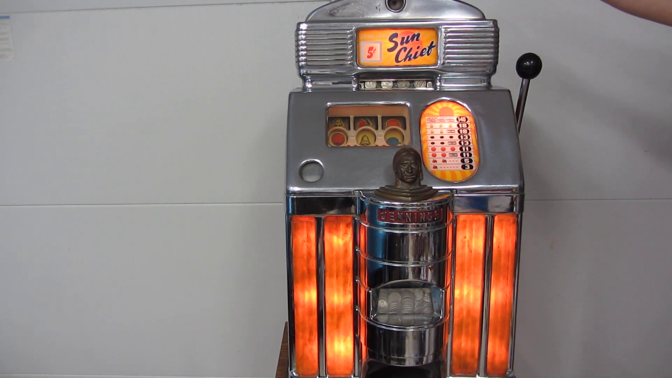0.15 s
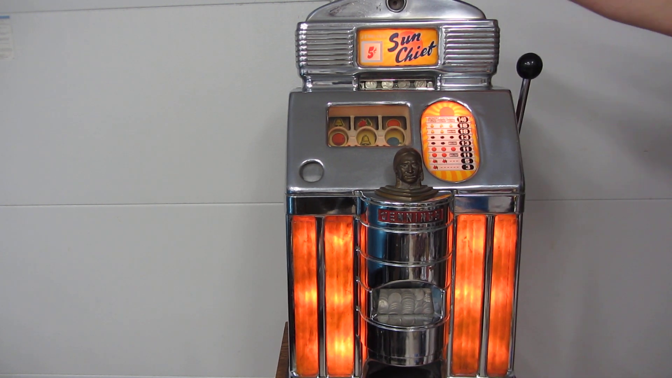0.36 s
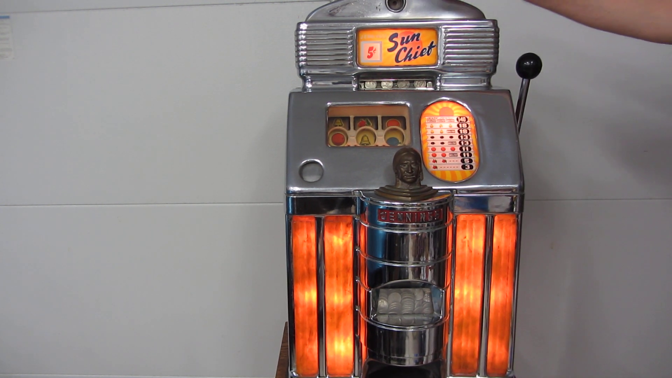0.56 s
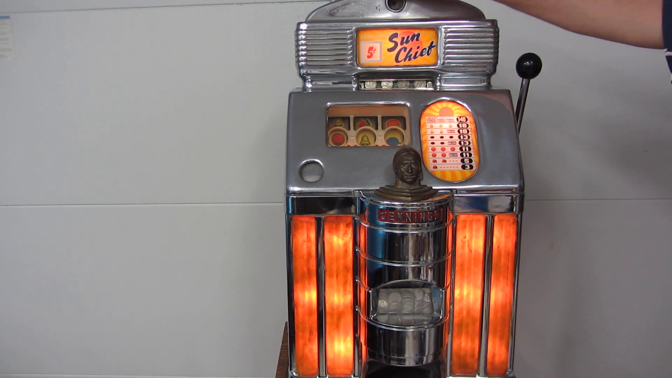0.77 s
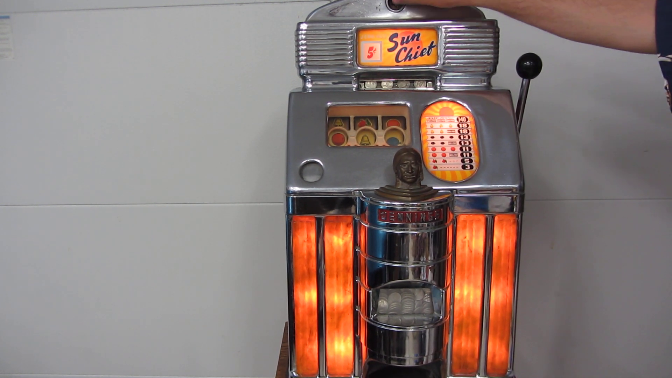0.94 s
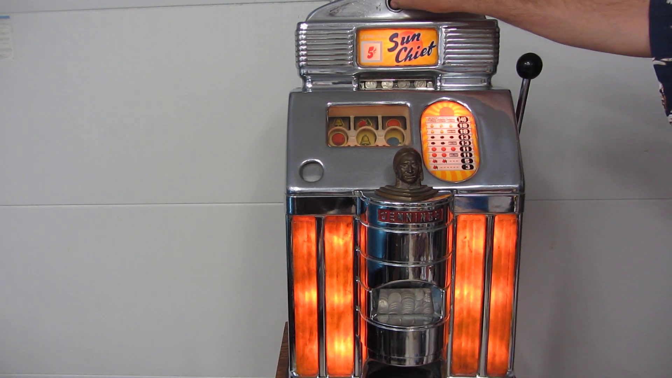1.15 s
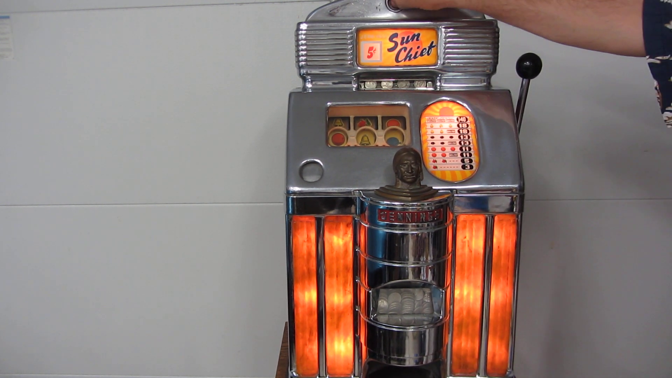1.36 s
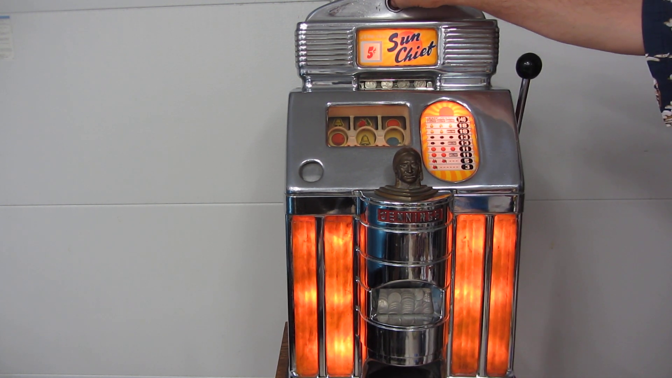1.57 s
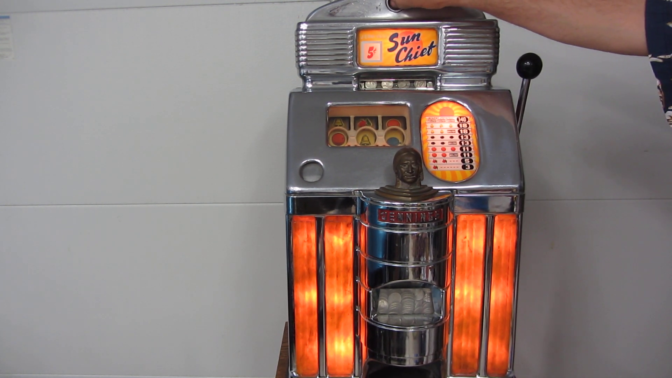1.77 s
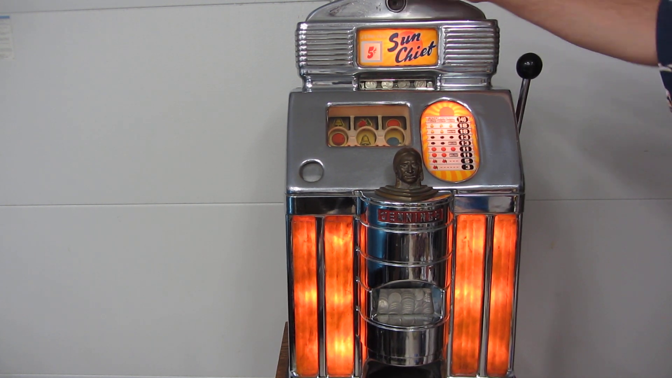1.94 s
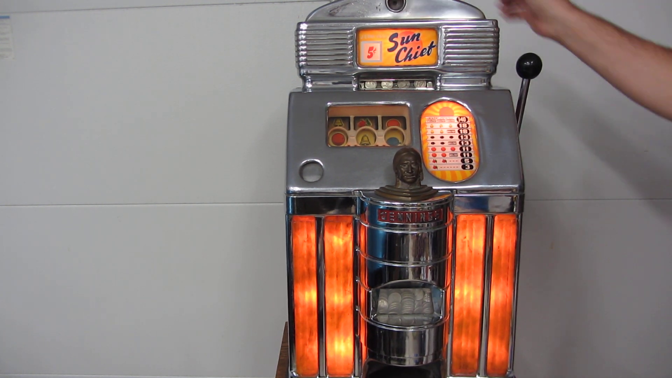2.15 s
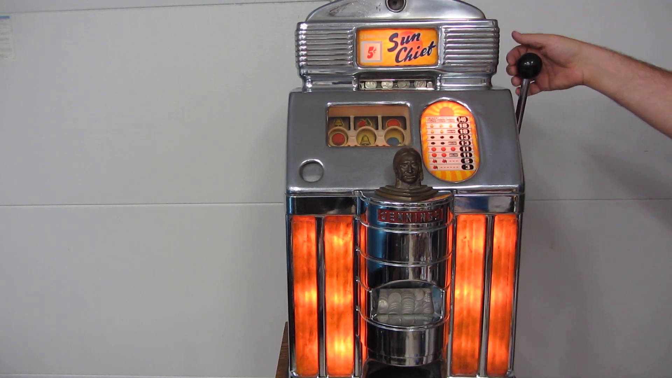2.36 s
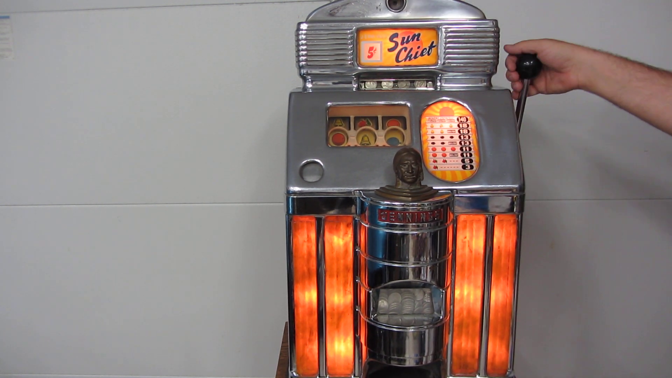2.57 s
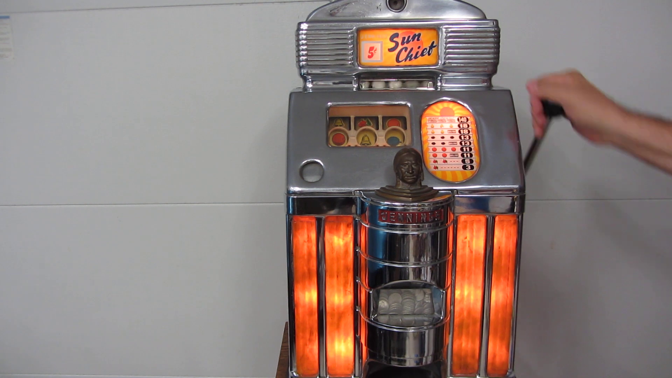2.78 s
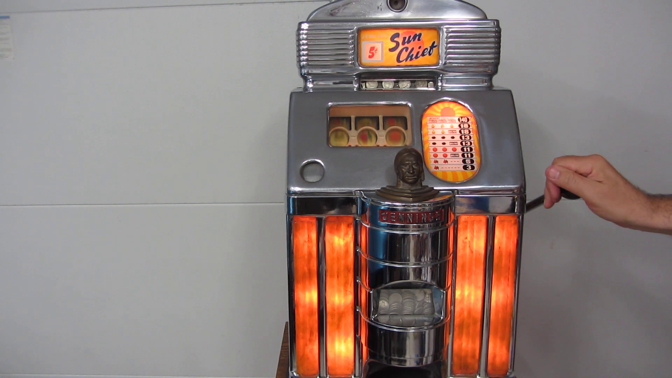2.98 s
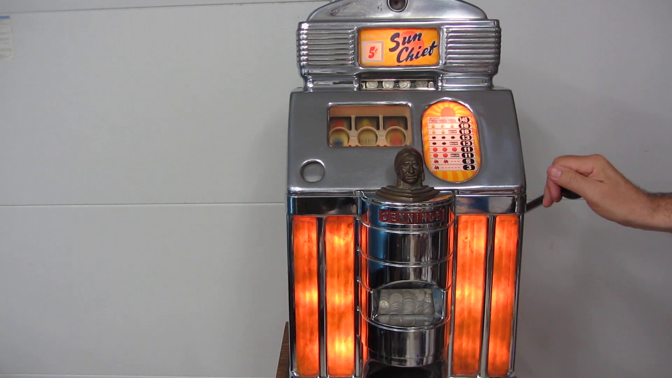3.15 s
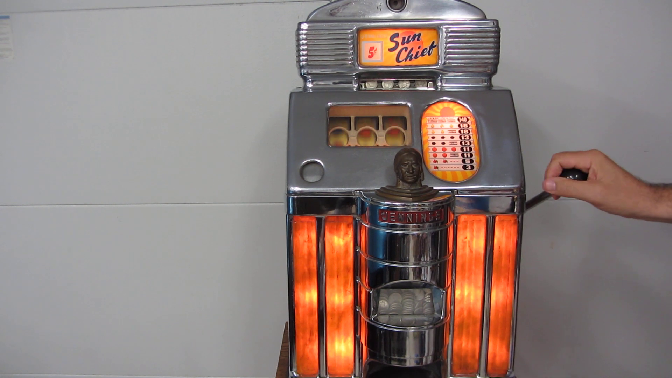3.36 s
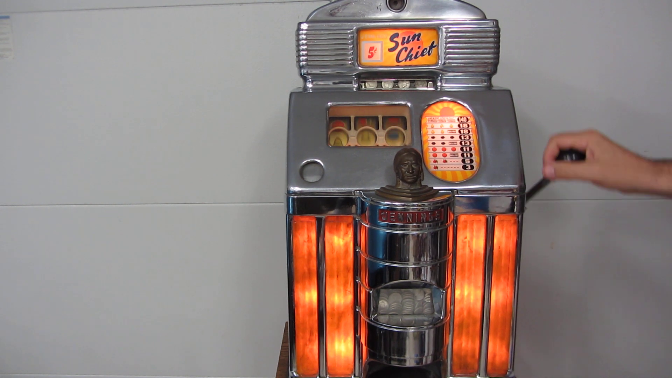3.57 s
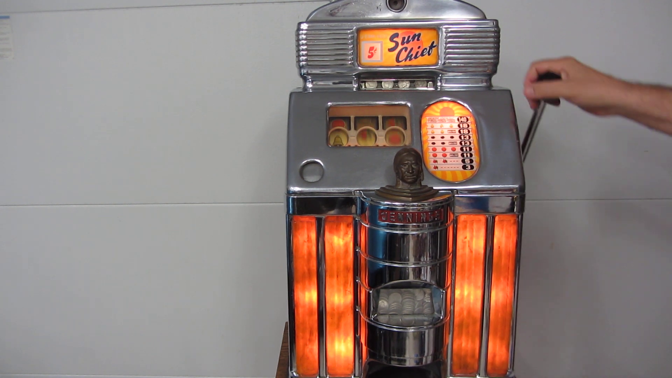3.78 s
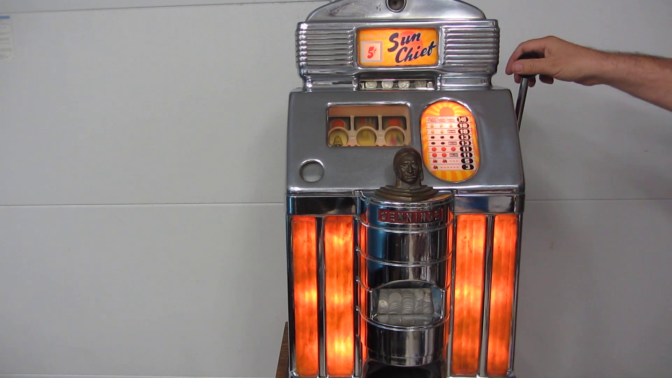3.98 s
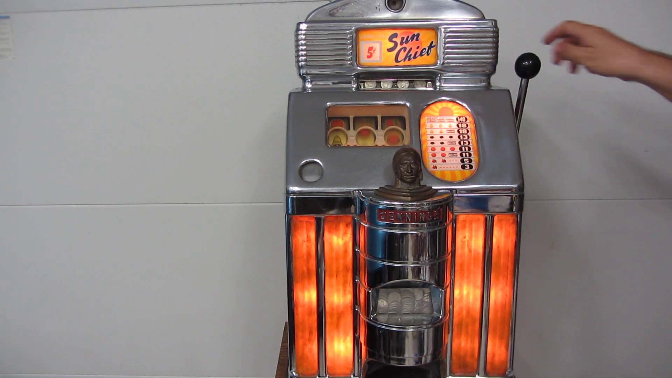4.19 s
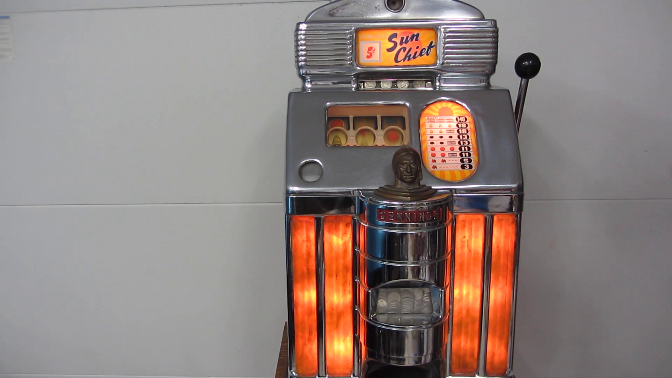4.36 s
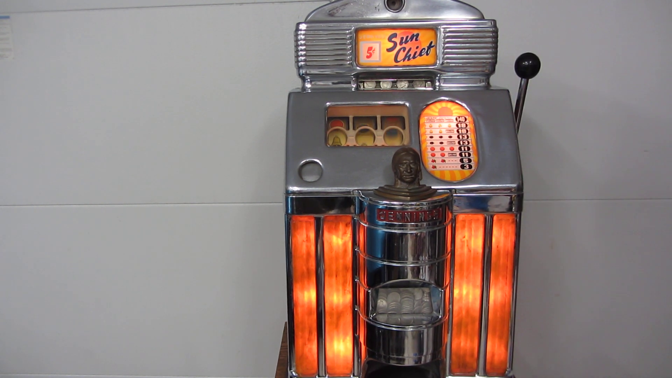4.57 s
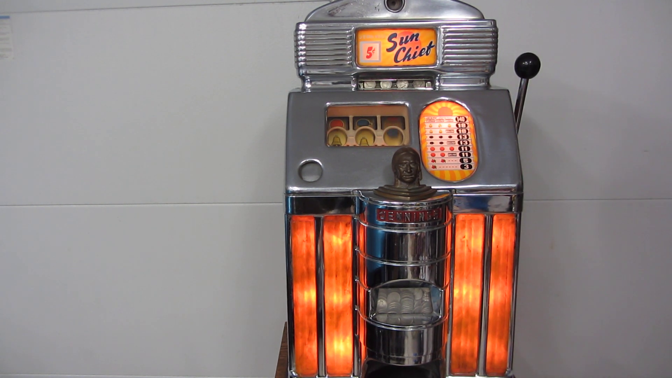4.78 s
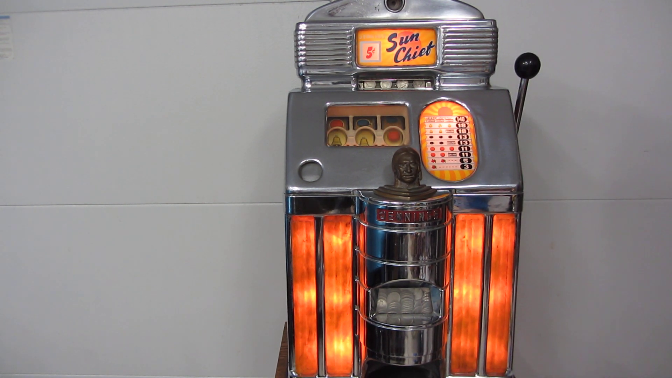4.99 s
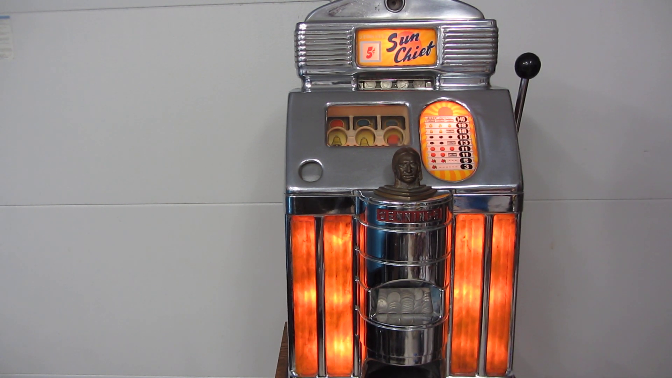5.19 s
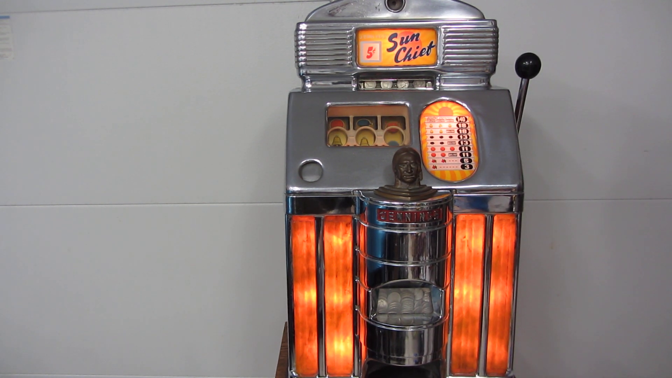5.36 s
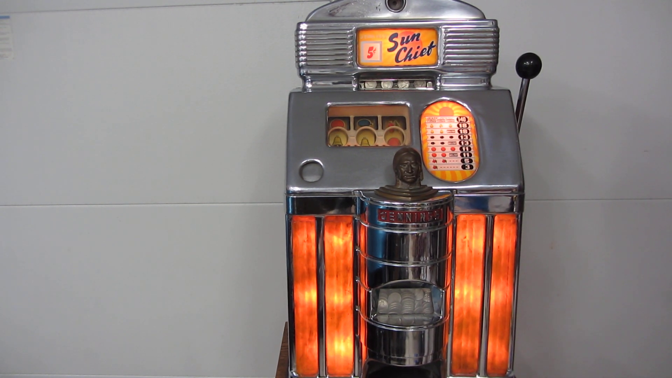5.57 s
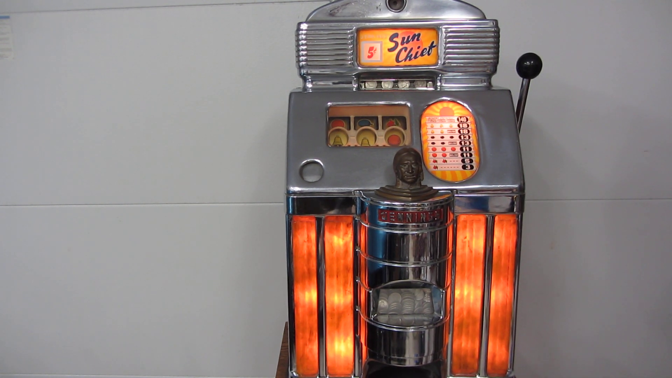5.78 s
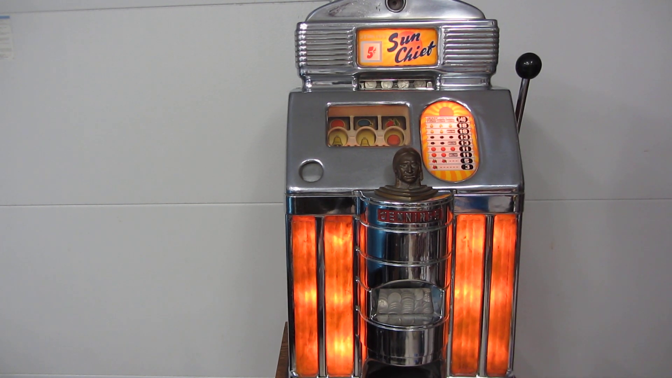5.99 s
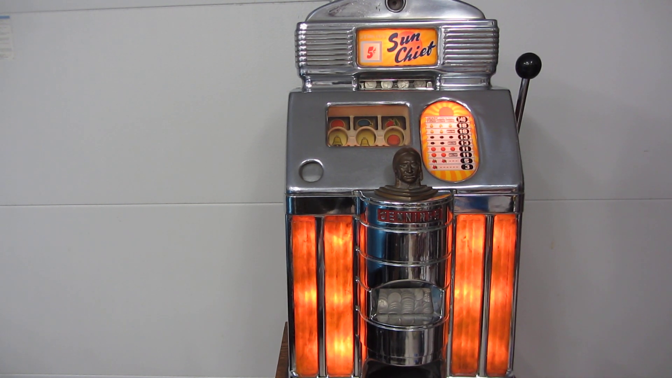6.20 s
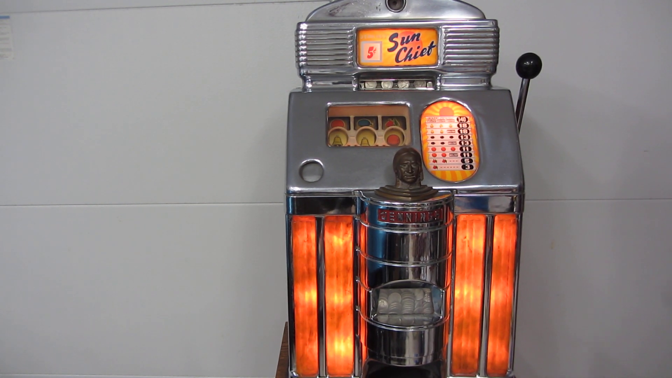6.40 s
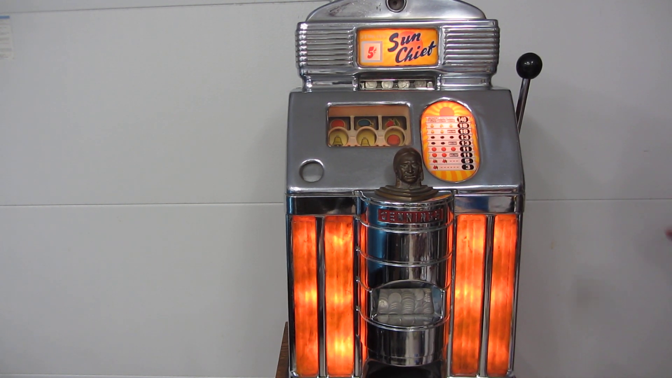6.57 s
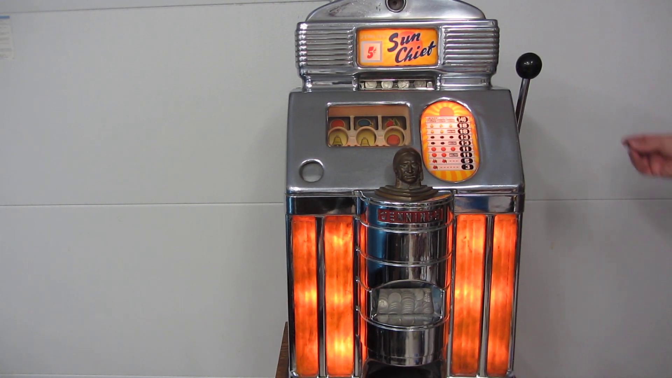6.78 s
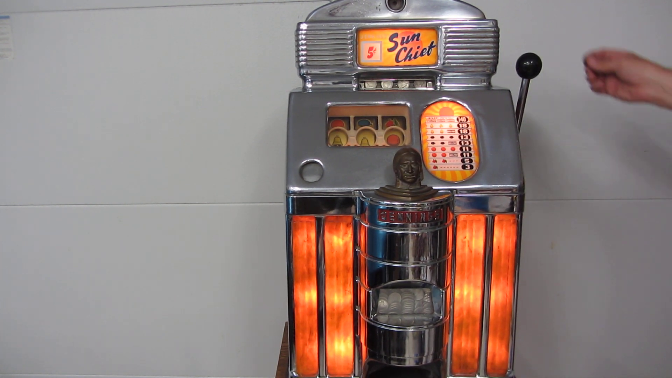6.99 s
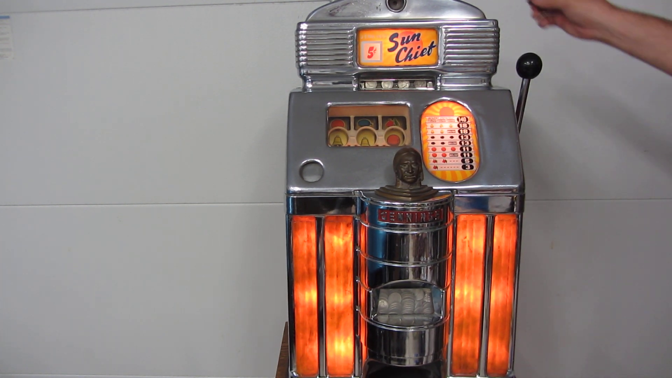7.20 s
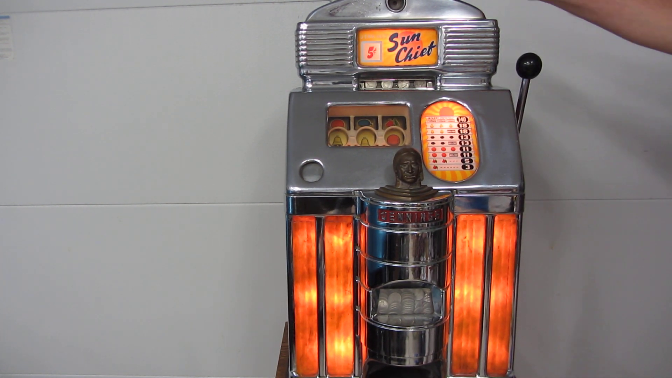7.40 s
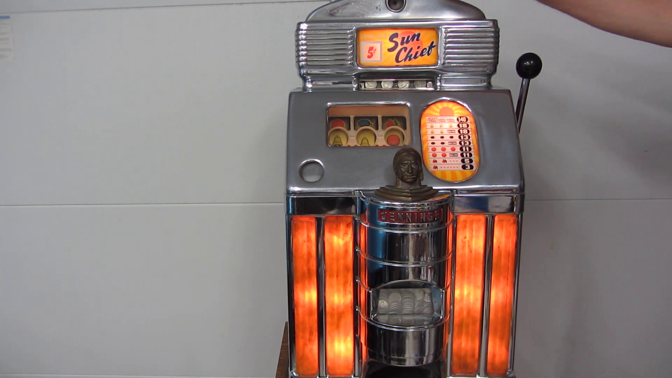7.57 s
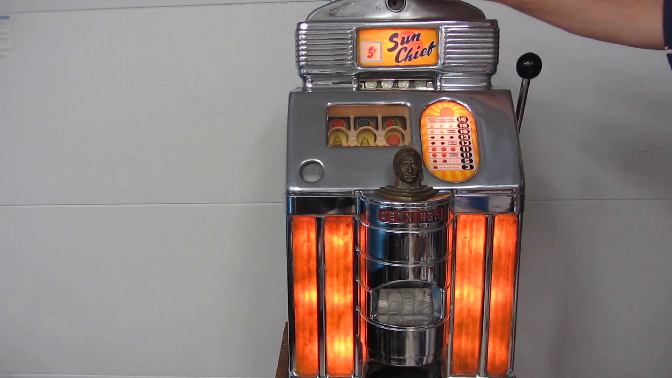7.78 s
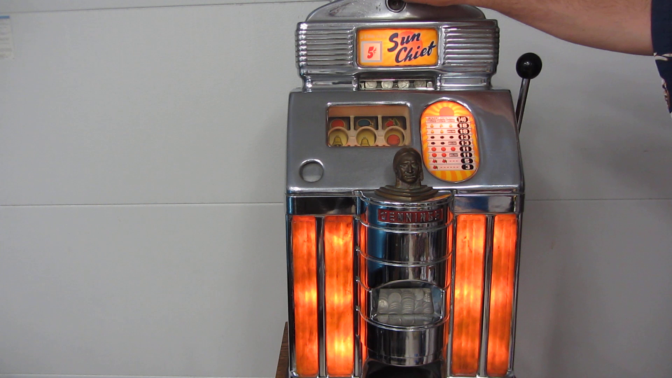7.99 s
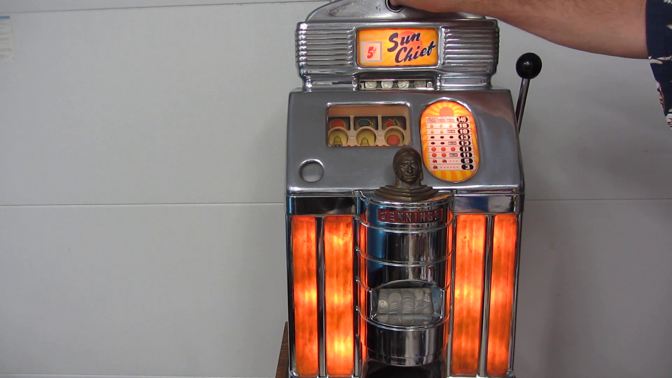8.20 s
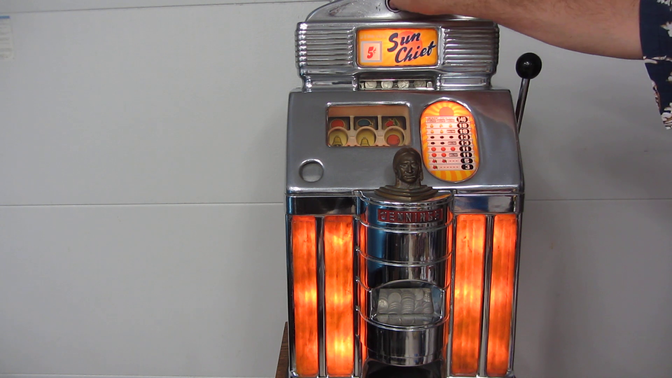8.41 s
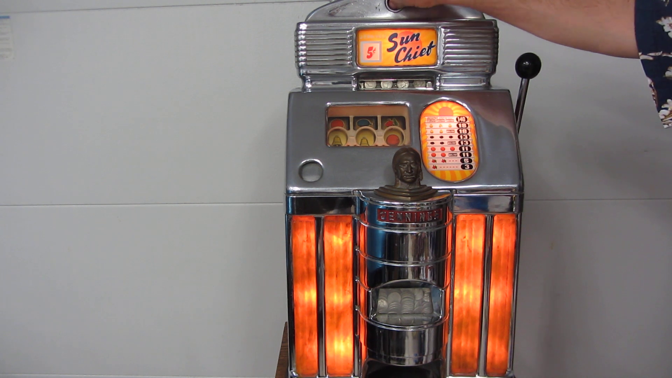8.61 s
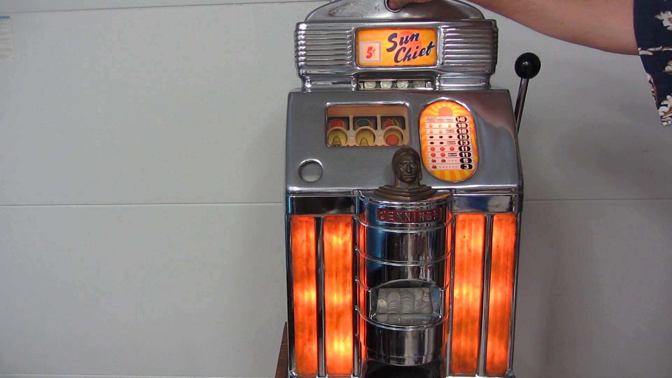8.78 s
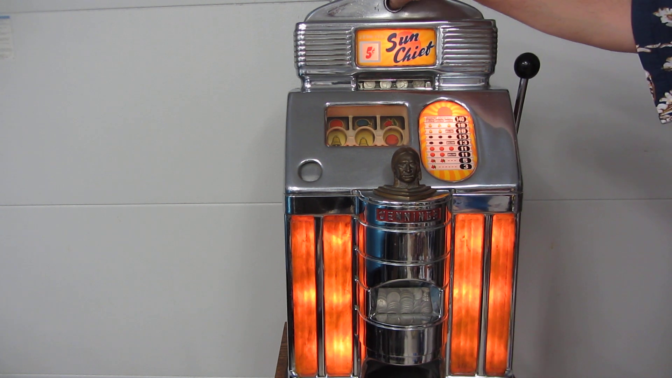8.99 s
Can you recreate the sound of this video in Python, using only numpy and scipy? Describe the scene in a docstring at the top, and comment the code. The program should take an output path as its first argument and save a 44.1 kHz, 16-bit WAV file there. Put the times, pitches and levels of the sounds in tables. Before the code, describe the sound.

Close stereo pickup of a vintage mechanical slot machine in a small quiet room. A sharp snap ends one spin, a latch clunks, and a coin rattles down the chute. The handle ratchets down with dense heavy clacks, levers kick the reels, and they whirr while the handle clicks back. The reels stop one by one with hard clacks, a latch clicks, and another coin is lightly handled.

```python
"""In a small room, a mechanical slot machine ends one game and plays another.
A coin rattles down the chute, the handle is pulled and returns, reels whirr and stop, the next coin
is fed in. Blows are bursts of banded noise coloured by the resonances of each part; clanks, cabinet and
springs are decaying sinusoids. The reels are resonated steady noise, over room air and lamp tones."""
import sys
import numpy as np
from scipy import signal
from scipy.fft import rfft, irfft, next_fast_len
from scipy.io import wavfile

SR = 44100
rng = np.random.default_rng(int(sys.argv[2]) if len(sys.argv) > 2 else 0)


def log_audio(samples):
    """Write samples as a 16-bit WAV file to the path given in sys.argv[1]."""
    # one column per channel
    frames = np.atleast_2d(samples).T
    # limit to full scale, then quantise
    limited = np.clip(frames, -1, 1)
    pcm = np.round(limited * 32767).astype(np.int16)
    wavfile.write(sys.argv[1], SR, pcm)


N = 399105

# Blows, all relative levels: (time [s], clack level [dB], brightness [dB], low thump level [dB])
# Coins handled, pushed into the slot and falling down the chute, columns as above
COIN_BLOWS = [(1.1428, -40, -11, -51), (1.2136, -33, -1, -58), (1.264, -37, -2, -55), (1.3127, -26, 0, -52),
              (1.3987, -35, 7, -51), (1.4268, -38, -6, -65), (1.4975, -21, 6, -58), (1.516, -22, 6, -60),
              (1.545, -26, -4, -50), (1.5681, -19, 6, -65), (1.5914, -18, -3, -54), (1.6335, -10.5, 1, -30),
              (1.7725, -24.5, 0, -29), (1.8306, -39, 3, -38), (2.0895, -30, 0, -42), (5.0565, -38, -8, -55),
              (5.1246, -52, 13, -55), (5.2953, -55, 13, -58), (5.319, -48, 13, -55), (5.331, -51, 17, -58),
              (7.5605, -48, -18, -58), (7.8133, -24, -4, -57), (8.0992, -52, -20, -55),
              (8.3385, -33, 2, -50), (8.4018, -32, -3, -63), (8.4508, -39, -7, -62), (8.4837, -29, 1, -64),
              (8.655, -37.5, -6, -57)]
# The handle takes up the mechanism, cocks the springs and hits its stop, columns as above
PULL_BLOWS = [(2.6572, -45, -6, -50), (2.7034, -17, -5, -21.5), (2.8165, -17, 4, -28),
              (2.8604, -14, 4, -31), (2.8982, -17, 2, -30), (2.938, -14.5, -3, -24), (2.9708, -11, 1, -29),
              (2.9894, -17, 2, -15), (3.061, -23, 0, -28.5), (3.0789, -23, -1, -24.5),
              (3.1315, -35, 2, -50), (3.205, -42, 1, -46), (3.2351, -46, -13, -44), (3.3327, -37, -6, -41)]
# The reel levers lift, kick the reels off and drop into the first two, columns as above
LEVER_BLOWS = [(3.477, -44, 0, -52), (3.493, -18.5, -2, -37), (3.5657, -16, -6, -25), (3.682, -31, -5, -32),
               (3.7357, -24, -7, -29), (3.7544, -31, -9, -31), (3.8211, -32, -4, -32),
               (3.8647, -7.5, -0.5, -21), (4.584, -11, 1, -25), (4.664, -17, -1, -38),
               (4.6991, -31, -5, -29), (5.6138, -14, -0.5, -25), (5.6496, -16.5, -1, -28),
               (5.7429, -29, -6, -34.5)]
# The last reel is caught and the payout fingers snap forward, columns as above
FINGER_BLOWS = [(.176, -13, 3, -34.5), (.181, -12, -1, -28), (.2872, -25, -12, -52), (6.32, -10.5, 0, -40),
                (6.331, -13, -4, -28.5), (6.402, -26, -12, -42)]
# The timing bar latches at the end of a game, columns as above
LATCH_BLOWS = [(.7791, -17, -1, -36), (7.0076, -18, 0, -38)]
# The handle returns with a run of clacks while the reels spin, columns as above
HANDLE_RETURN_BLOWS = [(4.2283, -30, 2, -32), (4.2632, -35, 1, -49), (4.3156, -27.5, -1, -58),
                       (4.356, -29, 2, -47), (4.4184, -22, 0, -54), (4.4314, -28, 0, -57),
                       (4.4503, -13, 0, -48), (4.5057, -31, 4, -34)]
# First blow of a quick run, columns as above: pawl on ratchet teeth, levers juddering after the kick
FIRST_TOOTH = (2.727, -23.5, 2, -31.5)
FIRST_JUDDER = (3.9685, -22, 7, -40)

# Resonances of each part: (frequency [Hz], width [Hz], level against the rest of the rattle [dB])
COIN_MODES = [(551, 48, 6), (620, 25, 8.5), (887, 14.6, 11.5), (1000, 14, 9.5), (1308, 74, 3),
              (1795, 36, 6), (1813, 7.1, 10), (2064, 17, 9.5), (2457, 48, -1), (2583, 23.7, 11),
              (2776, 112, 3), (4440, 12, 8), (4280, 16, -20), (5350, 17, 11.5), (5430, 120, 2),
              (7200, 120, 9.5), (8730, 170, 8), (9463, 260, 7), (12020, 51, 0), (15180, 60, 16)]
PULL_MODES = [(352.6, 15, 7), (489.5, 10, 9.3), (553, 14, 5.8), (636, 105, 4), (673, 24, 3.5),
              (817, 18, 2.1), (875, 42, 4), (951, 13, 2), (1146, 33, 5), (1590, 27, 5), (1815, 16, 6.2),
              (1998, 18, 7.6), (2190, 24, 6), (2328, 60, 5), (2270, 58, 3.4), (2800, 43, 3.2),
              (2860, 87, 2.9), (2933, 94, 4.8), (3400, 88, 5), (4463, 49, 2.3), (10249, 33, 5.7),
              (13826, 39, 11)]
LEVER_MODES = [(301.3, 11, 5.2), (412.8, 76, 2.1), (476, 28, 6.4), (610, 37, 3.7), (830, 30, 4),
               (947, 12, 11), (1146, 15, 4), (1458, 25, 5.1), (1500, 62, 3.3), (1726, 21, 7.6),
               (1920, 44, 4), (2647, 66, 1.4), (2727, 63, 7), (2965, 68, 7.6), (3100, 17, 4),
               (3313, 56, 4.7), (3318, 69, 5.2), (3430, 85, 2.5), (3550, 74, 2.1), (3910, 57, 5.4),
               (3830, 81, 3), (4430, 32, 2.2), (4604, 105, 4.51), (6000, 99, 8), (7596, 52, 8.4),
               (8050, 72, 4.5)]
FINGER_MODES = [(1314, 26, 6), (1540, 57, 4.1), (1744, 19, 7.4), (2509, 31, 6), (2615, 51, 12),
                (2757, 33, 6.1), (3468, 23, 2.1), (4220, 35, 6), (4635, 59, 6), (4701, 52, 7),
                (4871, 86, 7), (5100, 35, 8.6), (6010, 53, 7.1), (5940, 50, 12), (6170, 43, 11),
                (7000, 36, 2.6), (7013, 36, 11), (7100, 22.6, 5), (7197, 49, 5.8), (7406, 75, 13),
                (7640, 78, 5.4), (8600, 140, 12), (9380, 78, 14), (9430, 78, 7), (10290, 42, 8),
                (10318, 58, 9.4), (12300, 54, 8), (12430, 100, 7.4)]
LATCH_MODES = [(282, 16, 18), (396, 7.4, 5.2), (800, 11, 4), (890, 21, 9.4), (1118, 59, 7), (1340, 18, 5),
               (1481, 16, 6.8), (1620, 30, 7.4), (1833, 33, 4.3), (2194, 33, 4.6), (2813, 16, 2.4),
               (3140, 37, 4.4), (3130, 33, 2.3), (5800, 72, 2.1)]
HANDLE_RETURN_MODES = [(630, 41, 6.5), (742, 100, 5.2), (824, 14, 15), (980, 24, 11), (1460, 21, 12),
                       (2013, 32, 9.7), (2190, 14, 9.1), (2250, 8.1, 4.2), (2333, 45, 12.3),
                       (3330, 61, 11.2), (4645, 34, 5.5), (5680, 65, 9), (7220, 85, 9.7), (8500, 39, 10)]
# Resonances of the reel drums: (frequency [Hz], width [Hz], level [dB])
DRUM_MODES = [(408, 9, 6.5), (572, 10, 9), (670, 8.2, 9.5), (890, 12, 3)]

# Spectrum of each part's rattle before its resonances: (frequency [Hz], relative density [dB per Hz])
COIN_COLOUR = [(35, -77), (60, -46), (136, -13), (274, -13.5), (540, -5.5), (767, -3.5), (903, 0),
               (1200, 2), (2650, -0.5), (3420, -3), (5330, -0.5), (16000, -28.5)]
PULL_COLOUR = [(24, -73.5), (40, -35.5), (96, -18.5), (151, -3), (226, 4), (542, -3.5), (1070, -2.5),
               (1180, -3), (2840, -9.5), (3830, -17), (4460, -16), (9940, -37), (16000, -51)]
LEVER_COLOUR = [(24, -67.5), (40, -39), (144, -1.5), (226, -9.5), (305, -8.5), (751, -14.5), (918, -13),
                (1020, -15), (1480, -12.5), (2150, -19.5), (3380, -19.5), (8130, -13), (11600, -27),
                (14100, -38), (16000, -41.5)]
FINGER_COLOUR = [(24, -71), (40, -42.5), (144, -5), (194, -7.5), (269, -4), (751, -13), (1760, -12.5),
                 (2210, -22.5), (2700, -19), (3740, -18), (6020, -14), (6490, -17.5), (7170, -12),
                 (14500, -24.5), (16000, -44)]
LATCH_COLOUR = [(24, -62), (40, -19), (137, 3), (220, -7), (297, -7), (422, -2), (733, -4.5), (873, -4),
                (1240, -7.5), (2210, -9), (4240, -20.5), (5580, -18.5), (16000, -45.5)]
HANDLE_RETURN_COLOUR = [(35, -69), (60, -57), (136, -7), (238, -22), (448, -13.5), (822, -7.5), (1170, -5),
                        (2250, -1), (2710, -8.5), (3340, -0.5), (4320, 2), (8710, 5), (16000, -13)]
# Spectra of the reel whirr and the room air: (frequency [Hz], relative density [dB per Hz])
SPIN_COLOUR = [(24, -60), (40, -19.5), (91, -12), (124, 2.5), (176, -12.5), (382, -13.5), (412, -15),
               (516, -11), (680, -14.5), (1020, -20), (1090, -16.5), (2100, -26.5), (2700, -26.5),
               (6820, -31), (16000, -63)]
AIR_COLOUR = [(15, -51), (25, -13), (92, -19.5), (120, 3), (149, -10), (242, -9.5), (293, -17), (476, -11),
              (516, -23.5), (575, -15.5), (1260, -21.5), (2110, -23), (2690, -28.5), (6380, -35),
              (16000, -59)]

# Spread of a blow through case and room:
# (frequency [Hz], build-up time [s], relative tail level [dB], tail t60 [s])
SPREAD = [(60, 0.017, 0, .5), (150, 0.025, -3.5, 0.43), (400, 0.0055, -8, .55), (1200, 0.009, -12, 0.39),
          (3500, 0.0056, -12, 0.39), (7840, 0.0018, -11.5, 0.37), (15000, .002, -12, .27)]
# Likeness of left and right noise: (frequency [Hz], correlation [-1 to 1])
LIKENESS = [(40, .2), (130, .92), (500, .86), (2000, .76), (6000, .68), (15000, .52)]
# Limits of the thump, body, clack and zing registers: (frequency [Hz])
REGISTERS_HZ = [80, 250, 1500, 5000, 16000]

# Hardest metal-on-metal contacts: (time [s], frequency [Hz], relative level [dB])
CLANKS = [(.179, 7540, -16), (1.311, 5900, -25.5), (1.5, 9340, -23), (1.516, 5930, -18), (1.578, 600, -27),
          (1.634, 2170, -20.5), (2.702, 1210, -17), (2.772, 726, -6.5), (2.773, 1720, -14),
          (2.861, 4280, -8.5), (2.867, 2510, -16), (2.9385, 1864, -4.5), (2.945, 1183, -12.5),
          (3.492, 3120, -19), (3.566, 8400, -26), (3.864, 4090, -12), (3.865, 13400, -24),
          (3.868, 900, -14), (3.968, 2410, -20), (4.0, 2060, -24), (4.419, 4700, -26), (4.45, 5060, -17),
          (4.458, 860, -20), (4.583, 3170, -10.5), (4.584, 8100, -15), (4.663, 8500, -23),
          (5.612, 3255, -13), (5.622, 4440, -13.5), (5.649, 3540, -15), (6.317, 4980, -14.5)]
# Booming modes of the cabinet: (frequency [Hz], relative level [dB], t60 [s])
CABINET_MODES = [(96, -20, .4), (133.5, -4.5, .5), (151.85, 0, 0.53), (197, -11, 0.54),
                 (299.6, -17.5, 0.27), (352, -14.5, 0.23), (485, -15.5, 0.15), (585, -10.5, 0.24)]
# Springs that sing on after a hard blow: (frequency [Hz], relative level [dB], t60 [s])
SPRING_MODES = [(1798, -49, .8), (2445, -60.5, 1.9), (3275, -65, 2.2), (4190, -67, 1.5), (7010, -40, .41)]
# Blows that set the springs off: (time [s], frequency of the spring struck hardest [Hz])
TWANGS = [(.177, 3275), (2.971, 4190), (6.32, 4190)]
# Thin high ringing of a coin or pawl: (time [s], frequency [Hz], level [dB])
ZINGS = [(1.313, 15300, -50), (1.399, 12050, -56), (1.6, 12000, -45), (2.704, 14000, -36.5),
         (2.97, 6560, -33), (2.99, 12600, -45)]
# Spins of the reels: (kick time [s], time the last reel stops [s])
SPINS = [(-2.3, .177), (3.865, 6.32)]
# Lamp hum and buzz: (frequency [Hz], rms level before the slow gain and balance [dB])
HUM = [(120, -64), (240, -70), (360, -76), (1560, -81.5), (1680, -76), (1800, -75), (1920, -74.5),
       (2040, -72.5), (2100, -80.5), (2160, -71), (2280, -79.5), (2400, -76)]
# Dips of the steady sounds: (time [s], level at that time on the rising line they sink to [dB])
DIPS = [(.177, -4.5), (2.9, -4.5), (6.32, -4.5)]

EDGES_HZ = np.geomspace(28, 17000, 29)
CENTRES_HZ = np.sqrt(EDGES_HZ[1:] * EDGES_HZ[:-1])
BLOW_S = .55
CLANK_T60_S, ZING_T60_S = .065, .5
SPIN_UP_S, SPIN_STOP_T60_S = .04, .15
SPIN_DB = -54  # before the drum resonances and the slow gain
AIR_DB = -53.5  # before the slow gain and balance
OPENING_DB, SINK_S, RECOVERY_DB_PER_S = -1, .1, 2.8
CUTOFF_HZ = 16100


def works(noise):
    """Source and filter: each part's blows excite a rattle, which its own resonances colour."""
    coins = rattle(COIN_BLOWS, COIN_COLOUR, noise, level_db=-3.2, body_db=-7, zing_db=-1,
                   t60=.07, tail_db=-4.0, lead_s=.001)
    pull = rattle(handle_blows(), PULL_COLOUR, noise, level_db=-1.0, body_db=-0.8, zing_db=-2.5,
                  t60=.11, tail_db=0.5, lead_s=.001)
    levers = rattle(lever_blows(), LEVER_COLOUR, noise, level_db=-1.7, body_db=-9, zing_db=-12,
                    t60=.09, tail_db=-0.5, lead_s=.001)
    fingers = rattle(FINGER_BLOWS, FINGER_COLOUR, noise, level_db=-3.0, body_db=-10, zing_db=-3,
                     t60=.09, tail_db=-1.5, lead_s=.001)
    latch = rattle(LATCH_BLOWS, LATCH_COLOUR, noise, level_db=1.5, body_db=-12, zing_db=-2,
                   t60=.11, tail_db=0.14, lead_s=0.00162)
    handle_return = rattle(HANDLE_RETURN_BLOWS, HANDLE_RETURN_COLOUR, noise, level_db=1.0, body_db=-14,
                           zing_db=-10, t60=.085, tail_db=-3.5, lead_s=.001)
    out = resonate(coins, COIN_MODES) + resonate(pull, PULL_MODES)
    out += resonate(levers, LEVER_MODES) + resonate(fingers, FINGER_MODES)
    return out + resonate(latch, LATCH_MODES) + resonate(handle_return, HANDLE_RETURN_MODES)


def handle_blows():
    """Growing spring tension: in the pull the ratchet clicks harder tooth by tooth."""
    return PULL_BLOWS + run_of_blows(FIRST_TOOTH, gap_s=.0215, slowing=1, step_db=3.8, count=4)


def lever_blows():
    """Dissipating motion: after the kick the levers judder ever slower and weaker."""
    return LEVER_BLOWS + run_of_blows(FIRST_JUDDER, gap_s=.031, slowing=1.2, step_db=-3.0, count=4)


def run_of_blows(first, gap_s, slowing, step_db, count):
    """Repeated impact: gaps form a geometric series and levels change by equal decibel steps."""
    s, clack_db, bright_db, thump_db = first
    gaps = [gap_s * slowing ** k for k in range(count - 1)]
    times = s + np.cumsum([0] + gaps)
    return [(at, clack_db + k * step_db, bright_db, thump_db + k * step_db)
            for k, at in enumerate(times)]


def rattle(blows, colour, noise, level_db, body_db, zing_db, t60, tail_db, lead_s):
    """Dense plate modes act as banded noise: it builds up, dies fast and leaves a room tail."""
    out = np.zeros((2, N))
    t = np.arange(int(BLOW_S * SR), dtype=np.float32) / SR
    build_s, room_db, room_t60 = (c[:, None].astype(np.float32) for c in at_bands(SPREAD))
    swell = 1 - np.exp(-t / np.maximum(build_s, 1e-4))
    tail = (from_db(room_db + tail_db) * dying(t, room_t60)).astype(np.float32)
    shares = band_shares(colour)
    log_centres = np.log(CENTRES_HZ)
    edges = np.log(REGISTERS_HZ)
    register_centres = (edges[1:] + edges[:-1]) / 2
    usual_power = np.histogram(log_centres, edges, weights=shares)[0]
    usual_db = 10 * np.log10(usual_power)
    chances = rng.random(len(blows))
    for (s, clack_db, bright_db, thump_db), chance in zip(blows, chances):
        # a sharper contact trades the part's body for its high zing
        body = clack_db + body_db - bright_db
        zing = clack_db + zing_db + bright_db
        registers_db = [thump_db, body, clack_db, zing]
        tilt_db = np.interp(log_centres, register_centres, registers_db - usual_db)
        gains = (np.sqrt(shares) * from_db(tilt_db + level_db)).astype(np.float32)
        direct = dying(t, t60).astype(np.float32) * chatter(t)
        # independent direct and room sound add in power
        envelope = gains[:, None] * swell * np.sqrt(direct ** 2 + tail ** 2)
        start = int(chance * (N - len(t)))
        excerpt = noise[:, :, start:start + len(t)]
        add(out, np.einsum("bt,bct->ct", envelope, excerpt), s - lead_s)
    return out


def chatter(t):
    """Secondary impacts: loose parts bounce, so the rattle comes in lumps of a few milliseconds."""
    knots = np.arange(0, BLOW_S, .0025)
    lumps_db = 2.4 * np.interp(t, knots, rng.standard_normal(len(knots)))
    return from_db(lumps_db).astype(np.float32)


def clanks(level_db, spread, build_s):
    """Contact damping: a hard contact rings a cluster of close modes, damped by parts pressing."""
    out = np.zeros((2, N))
    steps = np.linspace(-1, 1, 7)
    for s, hz, db in CLANKS:
        scatter = rng.uniform(-.15, .15, len(steps))
        pitches = hz * (1 + spread * (steps + scatter))
        cluster = sum(ring(pitch, CLANK_T60_S, build_s) for pitch in pitches)
        add(out, from_db(db + level_db) * cluster / np.sqrt(len(steps)), s)
    return out


def cabinet(level_db, build_s):
    """Modal excitation: thumps of the heavy parts set the cabinet booming, each time a bit otherwise."""
    out = np.zeros((2, N))
    for s, _, _, thump_db in handle_blows() + lever_blows() + FINGER_BLOWS + LATCH_BLOWS:
        for hz, db, t60 in CABINET_MODES:
            varied_db = thump_db + level_db + db + 2 * rng.standard_normal()
            add(out, from_db(varied_db) * ring(hz, t60, build_s), s)
    return out


def springs(split_hz, twin_db, hardest_db):
    """Beating: a spring or coin swings in two planes at close pitches, so its thin ring wavers."""
    out = np.zeros((2, N))
    notes = [(s, hz, db, ZING_T60_S) for s, hz, db in ZINGS]
    for s, struck_hz in TWANGS:
        hardest = np.argmin([abs(hz - struck_hz) for hz, _, _ in SPRING_MODES])
        for k, (hz, db, t60) in enumerate(SPRING_MODES):
            notes.append((s, hz, db + hardest_db * (k == hardest), t60))
    for s, hz, db, t60 in notes:
        first_plane = ring(hz, t60, build_s=.004)
        second_plane = from_db(twin_db) * ring(hz + split_hz, t60, build_s=.004)
        add(out, from_db(db) * (first_plane + second_plane), s)
    return out


def reels(noise, wobble_hz, wobble_db):
    """Resonant filtering: whirr noise takes the notes of the tin drums and swells on every turn."""
    t = np.arange(N) / SR
    spinning = np.zeros(N)
    for kick, stop in SPINS:
        run_up = np.clip((t - kick) / SPIN_UP_S, 0, 1)
        spinning += run_up * dying(np.maximum(t - stop, 0), SPIN_STOP_T60_S)
    turn = np.sin(2 * np.pi * wobble_hz * t)
    # reversed in time, the noise does not coincide with the room air
    friction = steady(SPIN_COLOUR, noise[:, :, ::-1])
    whirr = spinning * from_db(SPIN_DB + wobble_db * turn) * friction
    return sink_and_recover() * resonate(whirr, DRUM_MODES)


def background(noise):
    """Superposition: room air as steady noise plus the mains buzz of the lamps as sinusoids."""
    t = np.arange(N) / SR
    hum = np.zeros(N)
    for hz, db in HUM:
        hum += np.sqrt(2) * from_db(db) * np.sin(2 * np.pi * (hz * t + rng.random()))
    air = from_db(AIR_DB) * steady(AIR_COLOUR, noise)
    return sink_and_recover() * (air + hum)


def sink_and_recover():
    """Slow gain in decibels: the steady sounds sink at set times, then rise at a constant rate."""
    t = np.arange(N) / SR
    db = OPENING_DB + RECOVERY_DB_PER_S * t
    for s, sunk_db in DIPS:
        rising_db = sunk_db + RECOVERY_DB_PER_S * (t - s)
        sinking = np.clip((t - s) / SINK_S, 0, 1)
        db = db + sinking * (rising_db - db)
    return from_db(db)


def ring(hz, t60, build_s):
    """Damped oscillation: one mode swells and dies, alike in both ears, cut off after 1 s at most."""
    t = np.arange(int(np.clip(t60, .1, 1) * SR)) / SR
    swell = 1 - np.exp(-t / max(build_s, 1e-4))
    wave = dying(t, t60) * swell * np.sin(2 * np.pi * (hz * t + rng.random()))
    return np.array([wave, wave])


def resonate(x, modes):
    """Resonance: a chain of narrow peaks (or dips), the narrower the longer each rings on."""
    sections = []
    for hz, width_hz, boost_db in modes:
        w = 2 * np.pi * hz / SR
        damping = np.pi * max(width_hz, 1) / SR
        zero = damping * from_db(boost_db)
        numerator = [1 + zero, -2 * np.cos(w), 1 - zero]
        denominator = [1 + damping, -2 * np.cos(w), 1 - damping]
        sections.append(np.array(numerator + denominator) / (1 + damping))
    # the tiny offset keeps the filter off exact silence
    return signal.sosfilt(sections, x + 1e-18)


def dying(t, t60):
    """Exponential decay: the amplitude falls by 60 dB in t60."""
    return np.exp(-np.log(1000) * t / np.maximum(t60, 1e-3))


def noise_bands(size):
    """Interaural correlation: third-octave noises, rms near 1, mix a shared and an opposed part."""
    white = rng.standard_normal((2, 2, size + SR // 10))
    bands = []
    for k, alike in enumerate(np.clip(at_bands(LIKENESS)[0], -1, 1)):
        bandpass = signal.butter(2, EDGES_HZ[k:k + 2], "band", fs=SR, output="sos")
        # the first tenth of a second, where the filter settles, is dropped
        both = signal.sosfilt(bandpass, white[k % 2])[:, -size:]
        mid, side = both / both.std(axis=1, keepdims=True)
        shared = np.sqrt((1 + alike) / 2) * mid
        opposed = np.sqrt((1 - alike) / 2) * np.array([side, -side])
        bands.append(shared + opposed)
    return np.array(bands, dtype=np.float32)  # bands x channels x samples


def steady(colour, noise):
    """Spectral weighting: noise bands sum to a given colour, rms near 1."""
    weights = np.sqrt(band_shares(colour)).astype(np.float32)
    return np.einsum("b,bct->ct", weights, noise)


def band_shares(colour):
    """Power spectrum: density times bandwidth gives the share of power in each band."""
    power = from_db(at_bands(colour)[0]) ** 2 * np.diff(EDGES_HZ)
    return power / power.sum()


def at_bands(rows):
    """Logarithmic frequency scale: table columns interpolated at the band centres."""
    hz, *columns = np.transpose(rows)
    return [np.interp(np.log(CENTRES_HZ), np.log(hz), c) for c in columns]


def from_db(db):
    """Decibel definition: level to amplitude gain."""
    return 10 ** (np.asarray(db) / 20)


def add(out, sound, s):
    """Superposition: mix a stereo sound in at time s."""
    start = max(round(s * SR), 0)
    out[:, start:start + sound.shape[1]] += sound[:, :N - start]


def place(x, right_db, lag_samples):
    """Level and time differences: from slightly right, the left side is weaker and later."""
    size = next_fast_len(N + SR // 10)
    # a delay is a phase that falls in proportion to frequency
    delay = np.exp(-2j * np.pi * lag_samples * np.arange(size // 2 + 1) / size)
    late = irfft(rfft(x[0], size) * delay, size)[:N]
    return np.array([late * from_db(-right_db / 2), x[1] * from_db(right_db / 2)])


def scene():
    """Superposition of the machine, a little to the right, and the quiet room."""
    noise = noise_bands(size=N)
    machine = works(noise)
    machine += clanks(level_db=-2.0, spread=.09, build_s=0.00089)
    machine += cabinet(level_db=-2.7, build_s=0.0067)
    machine += springs(split_hz=11, twin_db=-10, hardest_db=11)
    machine += reels(noise, wobble_hz=8.5, wobble_db=-0.5)
    balance = from_db([[-.4], [.4]])  # left, right
    return place(machine, right_db=1.3, lag_samples=1.0) + background(noise) * balance


def record(dry):
    """Band limits and saturation: microphones drop deep bass, peaks are rounded, the top cut steeply."""
    thin = signal.sosfilt(signal.butter(2, 45, "high", fs=SR, output="sos"), dry)
    rounded = .8 * np.tanh(thin / .8)
    steep = signal.ellip(10, .2, 80, CUTOFF_HZ, fs=SR, output="sos")
    return signal.sosfilt(steep, rounded)


dry = scene()
out = record(dry)
log_audio(out)
```